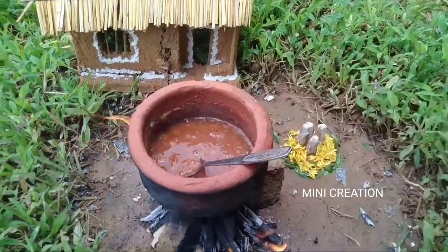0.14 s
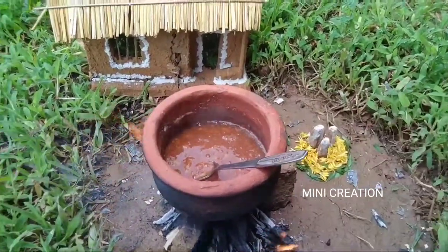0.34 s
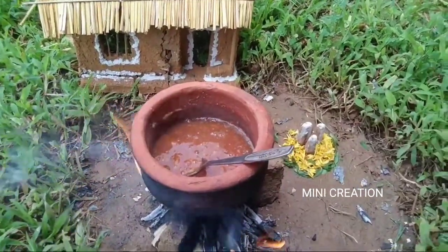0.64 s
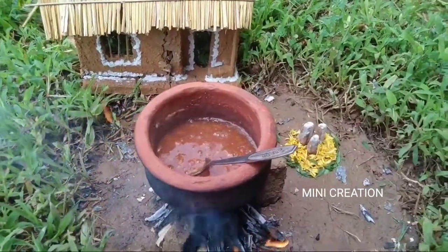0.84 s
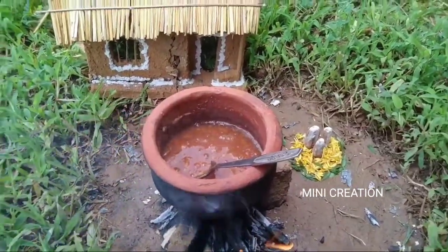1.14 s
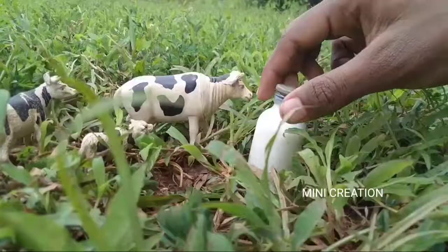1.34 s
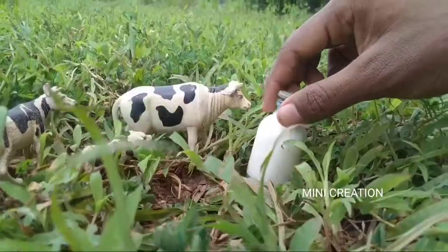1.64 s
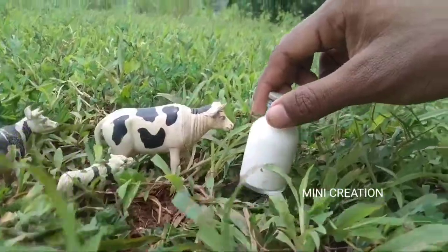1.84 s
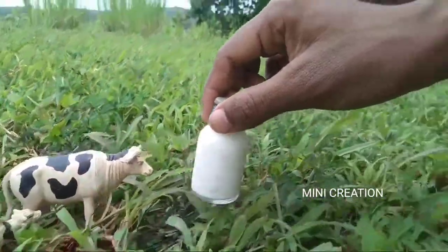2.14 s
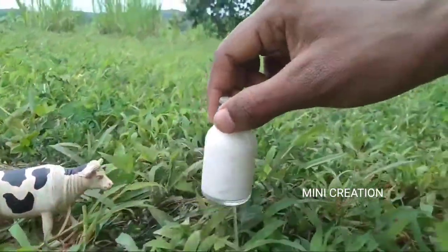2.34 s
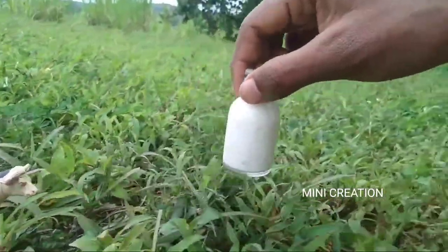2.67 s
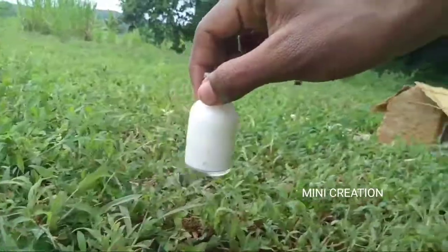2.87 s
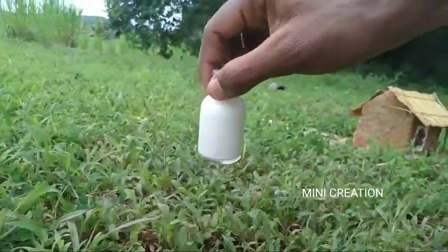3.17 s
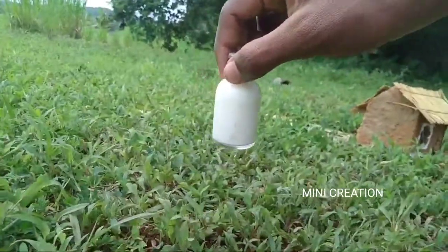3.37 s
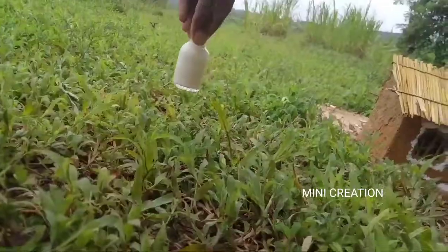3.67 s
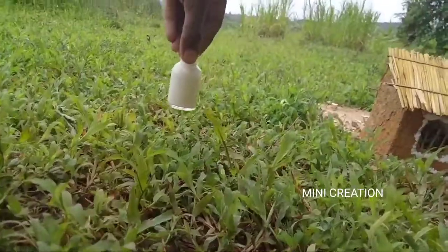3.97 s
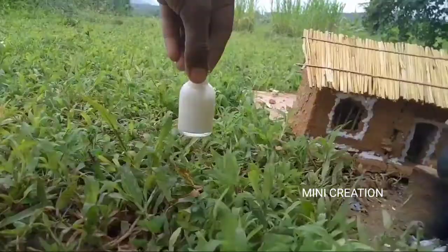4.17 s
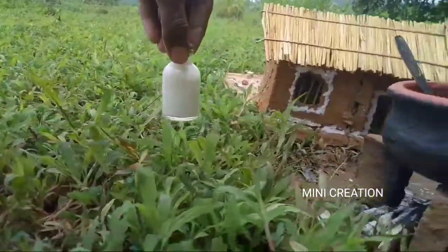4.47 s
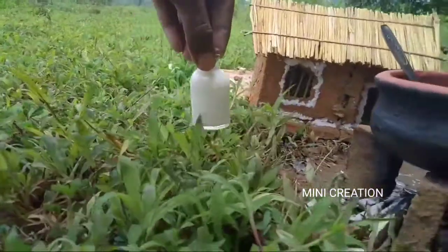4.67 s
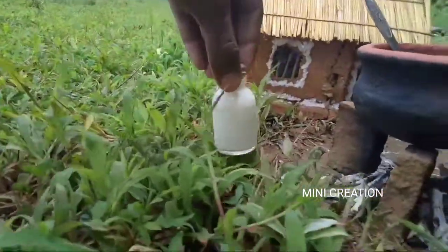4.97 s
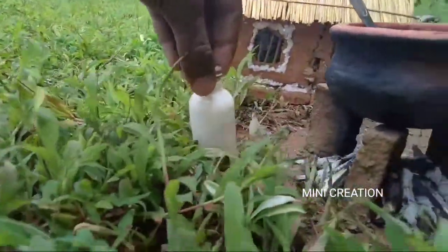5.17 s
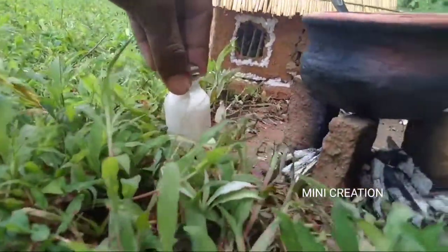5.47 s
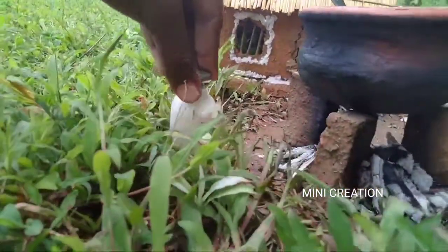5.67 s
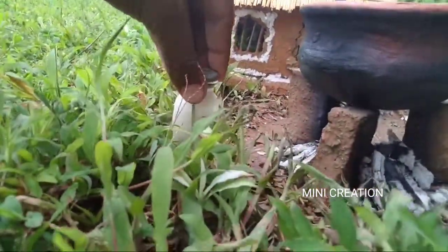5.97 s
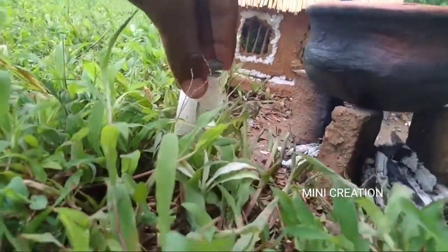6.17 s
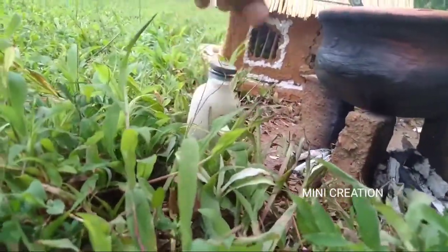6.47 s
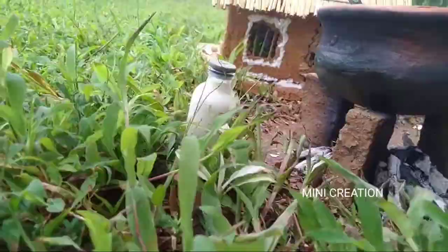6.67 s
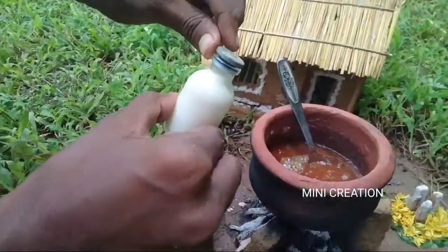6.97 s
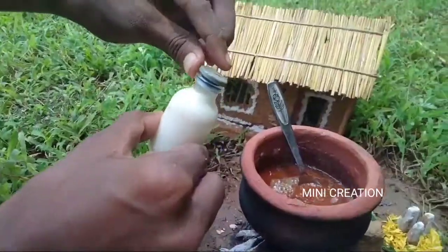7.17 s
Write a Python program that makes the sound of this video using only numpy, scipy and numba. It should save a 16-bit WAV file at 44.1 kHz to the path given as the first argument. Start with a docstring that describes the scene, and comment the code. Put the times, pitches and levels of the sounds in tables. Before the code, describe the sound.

Quiet meadow air with a few high bird chirps. The air abruptly becomes louder and closer, with grass rustle, small snaps and two wet mouth smacks. A cow creaks low, then moos long and clear, sagging and breaking off. Wind gusts, twig snaps and soft thumps follow while birds grow busy; the close air cuts out, leaving faint birds. Stereo, close and nearly dry.

```python
"""Small birds chirp in the trees over quiet meadow air. At about 1.5 s the air turns louder and closer:
shaped noise with rustling grass, wind, snapping twigs and soft thumps. A cow smacks its mouth (clicks and ringing
sines), creaks low (slow pulses) and gives one long moo (glottal pulses through moving formants), a clear note
that starts in breath noise, sags and breaks off at 3.8 s. The birds, gliding whistles, grow busier from 4.7 s;
at 6 s the close air cuts out and leaves them over faint air and a narrow drone."""
import sys
import numpy as np
from scipy import signal
from scipy.fft import rfft, irfft, next_fast_len
from scipy.io import wavfile
from scipy.ndimage import uniform_filter1d, map_coordinates
from numba import njit

SR = 44100
rng = np.random.default_rng(int(sys.argv[2]) if len(sys.argv) > 2 else 0)


def master(y):
    """Save y as 16-bit WAV."""
    cut = np.clip(np.atleast_2d(y).T, -1, 1)
    pcm = np.round(cut * 32767)  # scale
    wavfile.write(sys.argv[1], SR, pcm.astype(np.int16))


N = 322812
TIME = np.arange(N) / SR  # seconds
TOP_HZ = 15600  # band limit
NEAR_FROM, NEAR_TO = 1.467, 5.958  # the close air, in seconds
MOO_FROM, MOO_TO = 2.04, 3.812  # the voiced note, in seconds
THIRD_HZ = 1694  # third formant with a narrow mouth
UPPER_FOLLOWS = 0.75  # dB of the upper resonances per dB of effort
STRAIN_AT, STRAIN_S, STRAIN_DB = 3.72, 0.04, 5  # the upper resonances flare as the voice breaks


def amp(db):
    """Decibels to gain."""
    return 10 ** (np.asarray(db) / 20)


def unit(x):
    """x at rms 1."""
    return x / np.sqrt(np.mean(x ** 2) + 1e-20)


def along(points, hz):
    """Read a curve of (Hz, value) points on a log frequency axis."""
    f, v = np.transpose(points)
    return np.interp(np.log(hz + 1), np.log(f + 1), v)


def curves(rows):
    """One value per sample for each column after the time."""
    s, *columns = np.transpose(rows)
    return [np.interp(TIME, s, column) for column in columns]


def between(start, end, fade=0.004):
    """1 from start to end, with short ramps inside."""
    return np.clip((TIME - start) / fade, 0, 1) * np.clip((end - TIME) / fade, 0, 1)


def bell(s, width):
    """A smooth rise and fall around s seconds, peak 1."""
    return np.exp(-((TIME - s) / width) ** 2)


def wobble(rate):
    """A smooth random curve, rate knots a second."""
    knots = rng.standard_normal(int(N * rate / SR) + 4)
    return map_coordinates(knots, [TIME * rate])


def filtered(x, response):
    """x shaped by a response that is a function of frequency in Hz."""
    m = next_fast_len(N + SR // 2)
    return irfft(rfft(x, m) * response(np.fft.rfftfreq(m, 1 / SR)), m)[..., :N]


def add(track, s, sound):
    """Mix a sound into a track at s seconds."""
    part = track[max(0, round(s * SR)):][:len(sound)]
    part += sound[:len(part)]


def placed(x, left_db):
    """Pan by level: the left is left_db louder than the right."""
    return x * amp([[left_db / 2], [-left_db / 2]])


@njit
def resonator(x, tuning, damping):
    """A two-pole band-pass whose tuning may move."""
    y, a, b = np.zeros(len(x)), 0.0, 0.0
    for i in range(len(x)):
        g = tuning[i]
        band = (a + g * (x[i] - b)) / (1 + g * (g + damping[i]))
        a, b = 2 * band - a, b + 2 * g * band
        y[i] = damping[i] * band
    return y


def formant(x, hz, width):
    """A resonance with steep skirts: the resonator twice, each pass width Hz wide."""
    hz = hz * np.ones(len(x))
    tuning = np.tan(np.pi * hz / SR)
    once = resonator(x, tuning, width / hz)
    return resonator(once, tuning, width / hz)


def burst(envelope, hz, width):
    """A puff of noise in one broad resonance, peak 1."""
    x = formant(envelope * rng.standard_normal(len(envelope)), hz, width)
    return x / np.abs(x).max()


def pulses(hz):
    """Glottal pulses with every harmonic at rms 1, and the phase of their cycle."""
    phase = 2 * np.pi * (np.cumsum(hz) / SR % 1 - 0.5)
    harmonics = np.floor(TOP_HZ / hz)
    train = np.sin((harmonics + 0.5) * phase) / (np.sin(phase / 2) + 1e-15)
    return (train - 1) / np.sqrt(2), phase


def rush(spectrum, patchy_db):
    """Stereo noise of rms 1 with patches of random gain and a likeness between the ears set by frequency."""
    # Each row: frequency in Hz, left-right likeness (1 = identical).
    alike = [(50, 0.89), (150, 0.91), (500, .8), (2000, 0.26), (10000, 0.86)]
    z = signal.stft(rng.standard_normal((2, N)), nperseg=512)[2]
    field = uniform_filter1d(rng.standard_normal(z.shape[1:]), size=6, axis=0)
    field = uniform_filter1d(field, size=12, axis=1)
    pair = signal.istft(z * amp(patchy_db * unit(field)), nperseg=512)[1][:, :N]

    def mid_side_response(hz):
        turn = np.arccos(np.clip(along(alike, hz), -1, 1)) / 2
        return amp(along(spectrum, hz)) * [np.cos(turn), np.sin(turn)]

    mid, side = filtered(pair, mid_side_response)
    return unit(np.array([mid + side, mid - side]))


def echoes(x, t60, spread):
    """Scatter from the surrounding trees: a dying noise tail, partly different in each ear."""
    t = np.arange(SR) / SR
    mid, side = rng.standard_normal((2, SR)) * amp(-60 * t / t60) * (1 - np.exp(-t / 0.0078))
    tails = np.array([mid + spread * side, mid - spread * side])
    return signal.fftconvolve(x[None], tails / np.linalg.norm(tails[0]), axes=1)[:, :N]


def open_air():
    """Steady meadow air as shaped noise: quiet before the close stretch, full within it, faint after."""
    # Spectra of the air before, during and after. Each row: frequency in Hz, relative density in dB per Hz.
    air_before, air_near, air_after = [(15, -44), (25, -20), (49, -5), (163, -0.5), (231, -7), (903, -7),
                                       (2130, -26), (2430, -24.5), (3830, -25), (4150, -19.5),
                                       (5420, -27.5), (15000, -37)], [(15, -31.5), (25, -5), (59, 3.5), (103, -5),
                                                           (326, -5.5), (558, -4.5), (655, -6.5),
                                                           (1580, -10.5), (2130, -15), (3260, -14.5),
                                                           (4380, -22), (7680, -20.5), (15000, -31)], [(15, -41), (25, -10.5),
                                                                             (142, 0), (293, -10),
                                                                             (383, -4.5), (811, -7),
                                                                             (1810, -21.5), (3260, -15),
                                                                             (6720, -32), (7680, -19),
                                                                             (9270, -45), (10000, -28),
                                                                             (15000, -46)]
    before = amp(-53) * rush(air_before, patchy_db=0.3) * (TIME < NEAR_FROM)
    after = amp(-65) * rush(air_after, patchy_db=-1.4) * (TIME > NEAR_TO)
    near = amp(-47.5) * rush(air_near, patchy_db=2.37)
    return before + after + near * between(NEAR_FROM, NEAR_TO)


def drone():
    """A faint far drone after the rustling: noise in one narrow resonance."""
    hum = formant(rng.standard_normal(N), 398.5, 48.2)
    return amp(-71.5) * unit(hum) * (TIME > NEAR_TO)


def wind():
    """Wind on the microphone: low fluttering noise that swells in gusts."""
    # Spectrum of the wind. Each row: frequency in Hz, relative density in dB per Hz.
    wind_colour = [(25, -2.5), (60, 1), (160, 4), (300, -12.5), (700, -31.5), (3000, -73.5)]
    # Gusts. Each row: time of the peak in seconds, level in dB before flutter and panning, width in seconds.
    gusts = [(3.0, -52, 0.095), (3.24, -46, 0.17), (3.74, -55, 0.1), (4.03, -54, 0.09), (4.56, -65, .06),
             (5.29, -48.5, 0.068), (5.57, -46.5, 0.2)]
    breeze = amp(-65)  # the wind between gusts
    swell = breeze + sum(amp(db) * bell(s, width) for s, db, width in gusts)
    blowing = swell * amp(1.8 * wobble(21)) * rush(wind_colour, patchy_db=0.8)
    return placed(blowing, left_db=6.5) * between(NEAR_FROM, NEAR_TO)


def rustle_and_breath():
    """Crackling wide noise swells for grass swishes and the moo's breath, each topped by high sizzle."""
    # Spectrum of the rustle. Each row: frequency in Hz, relative density in dB per Hz.
    rustle_colour = [(600, -15.5), (1500, 1.5), (3000, 3), (5000, -0.5), (7500, 2), (10000, -9),
                     (15000, -10.5)]
    # Swishes of grass; the long one at 2.25 s is breath noise under the moo's onset.
    # Each row: time of the peak in seconds, level in dB, width in seconds,
    # sizzle level in dB relative to the swell, sizzle centre in Hz.
    swells = [(1.54, -55, .13, -8.5, 9800), (2.25, -54, .25, -10.5, 10110), (2.97, -46.5, .03, -7, 10940),
              (4.17, -51.5, 0.047, -0.5, 8470), (4.41, -51, 0.13, -3, 8455),
              (5.17, -47.5, 0.055, -13, 10880), (5.73, -60, .1, 2, 13220)]
    swell = amp(-68.5)  # the grass between swishes
    sizzle = np.zeros(N)
    for s, db, width, sizzle_db, hz in swells:
        swell = swell + amp(db) * bell(s, width)
        hiss = unit(formant(rng.standard_normal(N), hz, 3800))
        sizzle += amp(db + sizzle_db) * bell(s, width) * hiss
    crackle = unit(rush(rustle_colour, patchy_db=3.0) * amp(1.4 * wobble(300)))
    return (swell * crackle + sizzle) * between(NEAR_FROM, NEAR_TO)


def snaps_and_thumps():
    """Twigs and stalks snap as sharp decaying noise bursts; thumps and puffs of wind swell and fade."""
    # Snaps and ticks in the grass. Each row: start in seconds, peak in dB before panning,
    # centre in Hz, time to fall 60 dB in seconds.
    snap_list = [(1.4874, -27, 1001, 0.052), (1.594, -29, 884, 0.027), (1.5934, -35, 9065, 0.025),
                 (4.035, -39.5, 4483, 0.0061), (4.228, -18, 8494, 0.014), (4.228, -24.5, 2800, 0.04),
                 (4.252, -22, 6575, .012), (4.2617, -23, 7030, 0.015), (5.189, -26, 1700, 0.017)]
    # Soft low thumps; the two near 5.5 s (5.522 and 5.61) are puffs of wind.
    # Each row: start in seconds, peak in dB before panning, centre in Hz,
    # length in seconds (the puff of noise is fullest after a third of it).
    thump_list = [(3.15, -29, 138, 0.048), (3.863, -39.5, 218, 0.03), (3.991, -32.5, 122, .04),
                  (4.031, -25.5, 116, 0.037), (4.085, -34, 99, 0.019), (4.511, -35, 178, 0.028),
                  (4.583, -38, 726, 0.026), (4.662, -31, 430, 0.021), (4.807, -32, 340, 0.0155),
                  (5.522, -37, 145, 0.075), (5.61, -36, 188, 0.047), (6.86, -58, 110.4, .05)]
    snaps, thumps, t = np.zeros(N), np.zeros(N), np.arange(SR // 4) / SR
    for s, db, hz, t60 in snap_list:
        add(snaps, s, amp(db) * burst(amp(-60 * t / t60), hz, 1.7 * hz))
    for s, db, hz, length in thump_list:
        u = 3 * t / length
        add(thumps, s, amp(db) * burst(u * np.exp(-u), hz, 1.4 * hz))
    return placed(snaps, left_db=2.5) + placed(thumps, left_db=5.5)


def run_notes(runs, voice):
    """A bird's runs as notes: evenly spaced, stepping in pitch and level, each gliding a little differently."""
    hz, length, glide, arch, step = voice
    notes = []
    for s, count, gap, db, swell_db in runs:
        for k in range(round(count)):
            note_glide = glide * rng.normal(1, 0.2)
            notes.append((s + k * gap, length, hz * (1 + step) ** k, note_glide, arch, db + k * swell_db))
    return notes


def birds():
    """Each note is a fast-quivering whistle on an arched glide, blurred by the trees."""
    # Four voices: high falling peeps, thin arched lisps, quick steep chips, a far bird sliding down.
    # Columns: first pitch in Hz, note length in seconds, then as shares of the pitch
    # the glide within a note, the arch and the step to the next note.
    peep_voice, lisp_voice = (7480, .075, -.065, 0, -.022), (8150, .095, .02, .012, -.016)
    chip_voice, far_voice = (4050, .035, -.22, 0, -.02), (3780, .085, -.09, .02, -.19)
    # Their runs. Each row: start in seconds, number of notes, spacing of the note starts in seconds,
    # first level in dB before the mix, swell in dB a note.
    peeps, lisps, chips, far_calls = [(.029, 2, .154, -39.5, 1), (1.605, 3, .147, -43.5, -2),
                                      (2.26, 2, 0.16, -47.5, 6.5), (3.553, 1, .15, -50, 0),
                                      (4.824, 2, .15, -52, 7), (7.0, 2, 0.2, -50.5, -1)], [(.868, 4, .16, -51, -.7), (6.345, 3, .148, -62.5, 1.5)], [(.9, 5, .101, -57, 3.5)], [(5.99, 3, 0.12, -64, -0.5),
                                                                                   (6.479, 3, 0.11, -60, -6.5),
                                                                                   (6.99, 3, .07, -66.5, -4)]
    # Freely sung whistles. Each row: start in seconds, length in seconds, pitch in Hz,
    # glide as a share of the pitch, level in dB before the mix.
    whistles = [(0.007, .12, 4235, -0.131, -43.5), (.2, 0.125, 6200, -.03, -55),
                (0.32, 0.029, 6770, -.08, -41), (.82, .5, 1850, -0.026, -64.5),
                (1.137, 0.18, 2280, 0.0057, -61.5), (4.694, 0.079, 4335, 0.15, -42.5),
                (4.766, 0.039, 4980, 0.062, -45.5), (4.94, 0.12, 6550, .06, -48.5),
                (4.985, 0.069, 5194, 0.025, -37.5), (5.029, 0.094, 4676, 0.0028, -43),
                (5.409, 0.12, 5950, 0.099, -43.5), (5.418, 0.064, 5030, -0.041, -43.5),
                (5.55, 0.098, 6096, 0.032, -40), (5.641, 0.049, 5700, -0.085, -38.5),
                (5.767, .06, 5510, -0.152, -42.5), (5.971, .13, 5310, 0.015, -43.5),
                (5.994, 0.24, 5950, .01, -42), (6.078, .12, 6450, -0.036, -40.5),
                (6.2, .19, 5460, 0, -49.5), (6.336, 0.048, 4795, -.13, -53.5),
                (7.098, 0.18, 2040, 0.02, -68.5), (7.198, .1, 2923, .05, -66)]
    whistle_arch, quiver_depth, octave_db = 0.0146, 0.017, -35  # the first two are shares of the pitch
    notes = [(s, length, hz, glide, whistle_arch, db) for s, length, hz, glide, db in whistles]
    notes += run_notes(peeps, peep_voice) + run_notes(lisps, lisp_voice)
    notes += run_notes(chips, chip_voice) + run_notes(far_calls, far_voice)
    song, quiver = np.zeros(N), 1 + quiver_depth * wobble(330)
    for s, length, hz, glide, arch, db in notes:
        u = np.linspace(-0.5, 0.5, int(length * SR))
        arched_glide = 1 + glide * u - arch * (2 * u) ** 2
        pitch = hz * arched_glide * np.resize(quiver[max(0, int(s * SR)):], len(u))
        phase = 2 * np.pi * np.cumsum(pitch) / SR
        tone = np.sin(phase) + amp(octave_db) * np.sin(2 * phase)
        swell = np.sqrt(np.abs(np.cos(np.pi * u)))
        add(song, s, amp(db) * swell * tone)
    return placed(amp(-4.0) * song + amp(-2.5) * echoes(song, t60=0.71, spread=0.32), left_db=3.5)


def smacks():
    """The wet mouth parts with a sharp click and its cavity rings as decaying sines."""
    # Smacks. Each row: start in seconds, level in dB.
    smack_list = [(1.6208, -23.5), (1.7984, -10)]
    # The mouth's ring. Each row: frequency in Hz, level in dB relative to the smack,
    # time to fall 60 dB in seconds.
    mouth = [(518, -27.5, .16), (746, -29.5, 0.217), (1660, -24.5, 0.14), (2010, -31, 0.23),
             (3170, -34.5, 0.11)]
    out, t = np.zeros(N), np.arange(SR // 4) / SR
    for s, db in smack_list:
        pop = formant(np.exp(-t / 0.00004), 1900, 5700)
        click = -0.75 * pop / np.abs(pop).max()
        click = click + 0.62 * burst(amp(-60 * t / 0.019), 1750, 1000)
        click = click + 0.29 * burst(amp(-60 * t / 0.017), 465, 800)
        click = click + 0.2 * burst(amp(-60 * t / 0.003), 10000, 12000)
        ring = sum(amp(level - 60 * t / t60) * np.sin(2 * np.pi * hz * t) for hz, level, t60 in mouth)
        add(out, s, amp(db) * (click + ring))
    return out


def creak():
    """Before the note catches, the folds flap slowly: uneven low pulses and breath through four resonances."""
    # Loudness of the creak. Each row: time in seconds, level in dB.
    creak_level = [(1.82, -56), (1.9, -49), (2.0, -43.5), (2.13, -39), (2.22, -39), (2.32, -48),
                   (2.42, -65)]
    # Its resonances. Each row: frequency in Hz, width in Hz, relative level in dB.
    creak_modes = [(136.9, 55, 3), (268, 77, -2.5), (687, 250, 2), (1483, 630, -8.5)]
    flaps = pulses(64 * (1 + 0.03 * wobble(30)))[0]
    flaps = unit(flaps) * amp(1.5 * wobble(60)) + 0.35 * rng.standard_normal(N)
    voice = unit(sum(amp(db) * formant(flaps, hz, width) for hz, width, db in creak_modes))
    return voice * amp(curves(creak_level)[0]) * between(1.82, 2.42)


def larynx_pitch():
    """The pitch scoops up to a slow climb, sags as the air runs out and drops when the voice breaks."""
    note_hz, climb_hz_per_s = 178.82, 9.775
    scoop_hz, scoop_s = 51.5, 0.168
    sag_hz, sag_s = 34.1, 0.177
    break_at, break_hz_per_s = 3.711, 415
    t = np.clip(TIME, MOO_FROM, MOO_TO)
    held = note_hz + climb_hz_per_s * (t - MOO_FROM)
    scoop = scoop_hz * np.exp((MOO_FROM - t) / scoop_s)
    sag = sag_hz * np.exp((t - MOO_TO) / sag_s)
    voice_break = break_hz_per_s * np.maximum(t - break_at, 0)
    return np.maximum(held - scoop - sag - voice_break, 60)


def larynx(rough):
    """Pulses plus turbulence gated once a cycle; a slack larynx beats unevenly in time and strength."""
    jitter = 0.0004 * wobble(25) + 0.025 * rough * wobble(130)
    beats, phase = pulses(larynx_pitch() * (1 + jitter))
    turbulence = np.std(beats) * unit((1 + np.cos(phase)) * rng.standard_normal(N))
    source = beats * amp(2.8 * rough * wobble(120)) + 0.74 * rough * turbulence
    return source * between(MOO_FROM, MOO_TO, fade=0.0091)


def head(source, effort_db, opening):
    """The resonances of nose and head; the upper ones rise a little as the mouth opens."""
    # Each row: frequency in Hz, width in Hz, level in dB before trim, strain and effort.
    head_modes = [(736, 24, -41), (1183, 78, -32), (2140, 110, -44), (2525, 200, -32), (3123, 220, -38.5),
                  (3960, 340, -46), (5347, 220, -47.5), (6040, 130, -55), (6730, 200, -59.5),
                  (7700, 200, -57), (8465, 500, -56.5), (9357, 490, -59.5), (11680, 1200, -70.5)]
    trim_db, open_share = -2, 0.045
    treble_from_hz, treble_follows = 3500, 0.42  # the treble follows effort less (dB per dB)
    strain_db = trim_db + STRAIN_DB * bell(STRAIN_AT, STRAIN_S)
    middle = source * amp(strain_db + UPPER_FOLLOWS * effort_db)
    treble = source * amp(strain_db + treble_follows * effort_db)
    stretch = 1 + open_share * (opening - 1)
    out = np.zeros(N)
    for hz, width, db in head_modes:
        drive = treble if hz > treble_from_hz else middle
        tuned_hz = hz * stretch if hz > THIRD_HZ else hz
        out += amp(db) * formant(drive, tuned_hz, width)
    return out


def hollowed(x):
    """Side cavities swallow narrow bands between the resonances."""
    # Each row: centre in Hz, width in Hz.
    hollows = [(965, 70), (2240, 130), (2830, 150), (3460, 280), (4290, 84), (5720, 370), (7120, 260)]
    floor = amp(-9)  # what each dip leaves at its centre

    def dip(f, hz, width):
        return 1 - (1 - floor) * 1j * f * width / (hz * hz - f * f + 1j * f * width)

    return filtered(x, lambda f: np.prod([dip(f, hz, width) for hz, width in hollows], axis=0))


def moo():
    """The larynx sounds through the moving throat, the chest and the head."""
    # Effort, a false start and then the swell. Each row: time in seconds, effort in dB.
    effort = [(2.05, -34.5), (2.135, -20), (2.23, -23.5), (2.33, -8.5), (2.58, 2.5), (2.9, 0.67),
              (3.3, -0.14), (3.7, 0), (3.81, -6.5)]
    # The mouth gapes briefly, then opens for the note. Each row: time in seconds, opening (1 = as in the held note).
    mouth_opening = [(2.05, 0.21), (2.13, 1.08), (2.19, 1.23), (2.235, -0.068), (2.36, 0.44), (2.58, 0.86),
                     (2.9, 1.005), (3.4, 0.93), (3.7, 0.89)]
    # Hoarse at both ends, clear while held. Each row: time in seconds, roughness from 0 to 1.
    hoarse = [(2.05, 0.55), (2.2, 0.2), (2.32, 0.12), (2.55, 0.04), (3.6, 0.04), (3.7, .08), (3.75, 0.42),
              (3.81, 0.42)]
    # A high resonance climbs to 2.9 s, drops, holds near 4.7 kHz and sinks at the end.
    # Each row: time in seconds, frequency in Hz, level in dB at full effort.
    high_formant = [(2.1, 4400, -36.5), (2.35, 4790, -41), (2.6, 5030, -44.5), (2.88, 5300, -53.5),
                    (3.0, 4700, -47), (3.6, 4730, -58.5), (3.735, 4160, -46), (3.8, 4170, -60)]
    (effort_db,), (opening,), (rough,) = curves(effort), curves(mouth_opening), curves(hoarse)
    high_hz, high_db = curves(high_formant)
    source = larynx(rough)
    age = TIME - MOO_FROM
    # the first formant sinks through the call, and the third grows
    first_hz = 602.7 + 45 * opening - 47.8 * age
    second_hz = 1192.7 + 265 * opening
    third_hz = THIRD_HZ + 179 * opening
    upper_db = UPPER_FOLLOWS * effort_db + STRAIN_DB * bell(STRAIN_AT, STRAIN_S)
    third_db = -27 + upper_db + 1.5 * age
    muffle_db = 28 * np.maximum(TIME - 3.257, 0)  # the second formant fades as the lips close
    first = formant(source * amp(-13 + effort_db), first_hz, 103.2)
    second = formant(source * amp(-14.5 + effort_db - muffle_db), second_hz, 110)
    third = formant(source * amp(third_db), third_hz, 186)
    high = formant(source * amp(high_db + UPPER_FOLLOWS * effort_db), high_hz, 210)
    # the chest hums along, little changed by effort
    chest = formant(source * amp(-53 + 0.25 * effort_db), 345, 80)
    return hollowed(first + second + third + high - chest + head(source, effort_db, opening))


def ports(x):
    """The two microphone ports hear the cow with slightly different colour and phase."""
    # Each row: frequency in Hz, left minus right in dB, left lead in radians.
    port_colour = [(492, -0.44, 0), (1400, -1, .12), (1960, -1.1, 0.46), (2600, 2, 0.55), (3300, 4.5, .1),
                   (4300, 5.5, 0), (5100, 1.5, 0.11), (9000, 0, 0)]
    hz, left_db, lead = np.transpose(port_colour)

    def left_and_right(f):
        half = amp(np.interp(f, hz, left_db) / 2) * np.exp(0.5j * np.interp(f, hz, lead))
        return np.array([half, 1 / half])

    return filtered(x, left_and_right)


def scene():
    """The cow stands near the middle, close and almost dry, with the meadow around it."""
    meadow = open_air() + drone() + wind() + rustle_and_breath() + snaps_and_thumps() + birds()
    cow = smacks() + creak() + moo()
    return meadow + ports(cow) + amp(-23) * echoes(cow, t60=0.5, spread=0.3)


def record(dry):
    """Nothing is kept above the band limit."""
    return filtered(dry, lambda hz: hz < TOP_HZ)


dry = scene()
out = record(dry)
master(out)
```